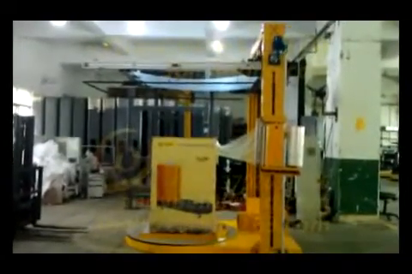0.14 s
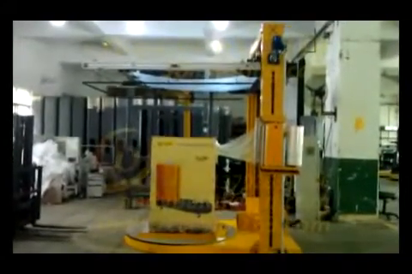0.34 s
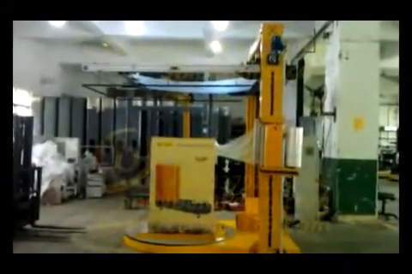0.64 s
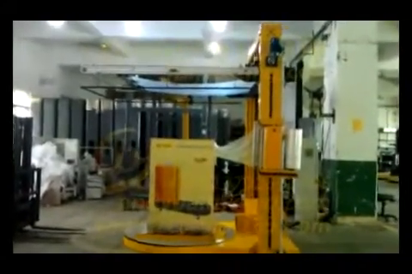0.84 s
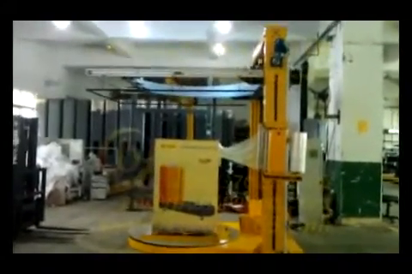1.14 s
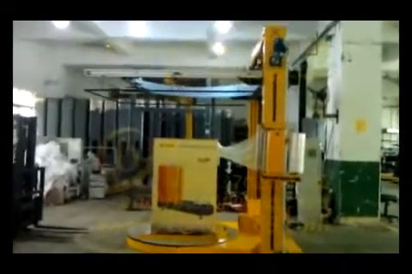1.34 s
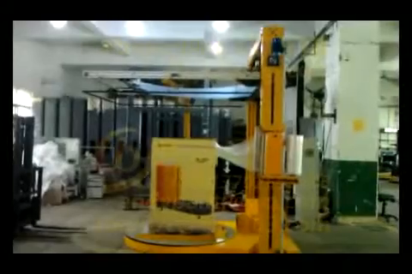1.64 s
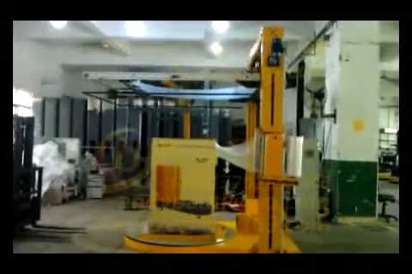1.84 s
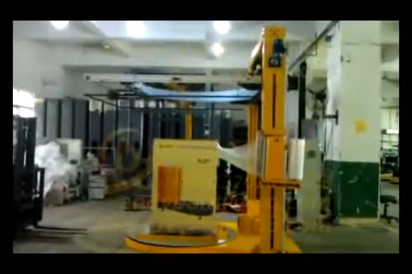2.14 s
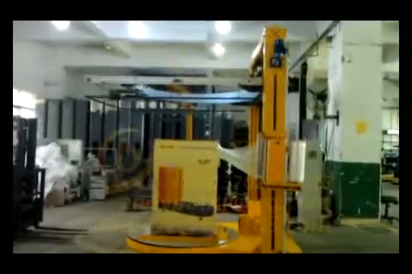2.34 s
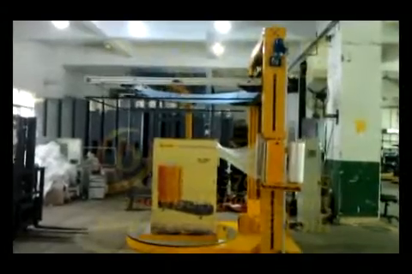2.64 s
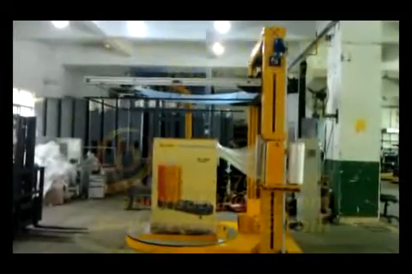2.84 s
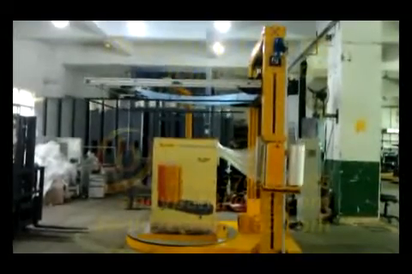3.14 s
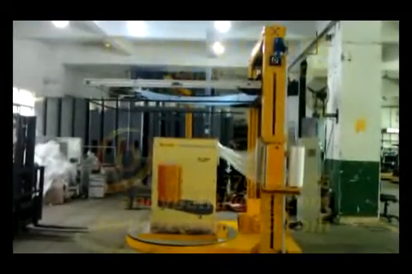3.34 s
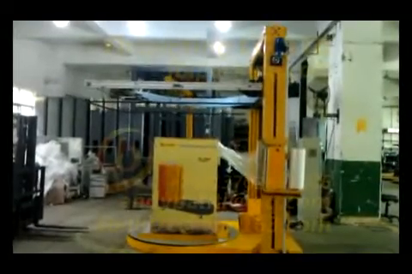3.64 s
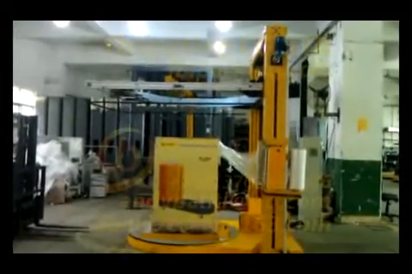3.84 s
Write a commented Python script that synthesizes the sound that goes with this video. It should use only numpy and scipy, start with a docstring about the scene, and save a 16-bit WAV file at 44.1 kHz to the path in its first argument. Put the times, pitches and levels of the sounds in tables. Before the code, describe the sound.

Stretch film is ripping from a wrapper's roll as it starts, a loud rasp until 0.25 s. At 0.7 s sharp snaps open a second crackling pull, fading by 1.15. A third judders from 1.7, ending in a big crack at 2.03 with brief metallic ringing. Small roller squeaks near 2.5 precede a long peel from 2.75, sinking in pitch until 3.7, then faintly brightening. Factory hum and hall echo persist.

```python
"""Stretch wrapping in a factory hall

A wrapper turns a pallet. Tacky film comes off the roll in juddering pulls, snaps loose with sharp cracks,
then peels in one long rasp that sinks in pitch as the roll slows and brightens again near its end.
The film sounds are random trains of stick-slip impulses, coloured by filters and answered by the hall;
the drive hums and whines underneath as noisy tones, over filtered factory noise."""
import sys
import numpy as np
from scipy import signal
from scipy.fft import rfft, irfft, next_fast_len
from scipy.io import wavfile
from scipy.ndimage import uniform_filter1d, map_coordinates

SR = 44100
rng = np.random.default_rng(int(sys.argv[2]) if len(sys.argv) > 2 else 0)


def store_pcm(level_fs):
    """Save levels as 16-bit WAV."""
    pcm = np.round(np.clip(level_fs, -1, 1) * 32767).astype(np.int16)
    wavfile.write(sys.argv[1], SR, np.atleast_2d(pcm).T)


N = 176400

# Spectra. Each row: frequency in Hz, relative level in dB.
FACTORY_SPECTRUM = [(25, -54), (55, -23.5), (90, -21), (140, -9), (240, -6.5), (400, -7.5), (700, -10),
                    (880, -9), (1400, -15), (1750, -8), (2700, -12), (4200, -8), (4800, -24.5),
                    (7000, -37.5), (10500, -36), (12500, -48), (14000, -98)]
TURNTABLE_SPECTRUM = [(25, -30), (60, -35), (140, -2.5), (320, 4.5), (450, -1), (580, 0), (700, -7.5),
                      (1300, -0.5), (3000, -55), (6000, -62)]
KNOCK_SPECTRUM = [(30, -18), (80, -2.5), (170, -0.5), (400, -1), (900, -8.5), (3000, -6), (7000, -70)]
SNAP_SPECTRUM = [(60, -20), (300, -8.5), (1200, -4.5), (2200, 10), (4200, 10), (5500, -3.5), (7800, -18),
                 (10000, -28), (15000, -38)]
CRACK_SPECTRUM = [(50, -30), (300, -7.5), (650, -9.5), (900, 0), (1250, -1.5), (1550, -5), (2300, 0),
                  (4200, 0.5), (5000, -7.5), (6500, -6.5), (7800, -11.5), (10500, -7.5), (15000, -27)]
RASP_SPECTRUM = [(60, -57), (200, -31), (600, -13.5), (1050, -8), (1400, -7), (1800, -4), (2280, 4),
                 (2600, -4), (3000, -2), (3500, -2), (4200, 1), (4900, -10.5), (5800, -45), (15000, -66)]
WEB_SPECTRUM = [(40, -20), (120, -20.5), (210, -12), (305, 2.5), (480, -3.5), (700, -6), (950, -4),
                (1500, -10.5), (3000, -37), (6000, -73)]
FIZZ_SPECTRUM = [(500, -68), (3000, -15), (4900, 8), (5600, 5.5), (6200, 5.5), (7700, -5.5), (10000, -2),
                 (12500, -8.5), (14000, -20), (15000, -40)]
PEEL_SPECTRUM = [(150, -24), (320, -6.5), (650, -7), (1200, -2), (2100, 0), (2900, -6), (3900, -0.5),
                 (4700, -9.5), (5800, -18.5), (7500, -25), (10500, -30), (12500, -41), (14000, -61)]

# Rolling noise of the turntable. Each row: time in seconds, mean level in dB.
TURNTABLE_RUN = [(0, -40), (.5, -47.5), (.7, -50), (1.25, -56.5), (1.55, -49.5), (2.1, -52.5), (2.7, -54.5),
                 (2.9, -42), (3.3, -46), (3.952, -39.5)]
# Hum and whine of the drive. Each row: frequency in Hz, level in dB, wobble rate in Hz.
DRIVE_LINES = [(229, -64, 8.9), (301, -60.5, 6.27), (897, -86, 16), (1760, -61, 22), (2240, -55, 54),
               (4140, -59, 18)]
# Brief squeaks and groans of the rollers. Each row: centre in seconds, pitch in Hz, peak level in dB,
# Gaussian spread in seconds.
SQUEAKS = [(2.506, 296, -41, 0.0059), (2.57, 4130, -41.5, 0.0068), (2.682, 4150, -44, 0.0073),
           (3.925, 582, -48, 0.2)]
# Faint rustle of slack film. Each row: time in seconds, level in dB.
RUSTLE_RUN = [(1.2, -80), (1.45, -59), (1.6, -76)]
# Knocks of the film carriage. Each row: start in seconds, level in dB, hold in seconds.
KNOCKS = [(0.71, -47, 0.012), (1.735, -42, 0.01), (1.865, -37, 0.025), (2.035, -41, 0.03),
          (3.026, -31, 0.0195)]
# Film snapping loose. Each row: start in seconds, level in dB, hold in seconds.
SNAPS = [(.069, -31, 0.0081), (.130, -38, 0.005), (.176, -31, 0.005), (.195, -39, 0.004),
         (.704, -24, 0.0049), (.710, -19.5, 0.004), (.765, -28.5, 0.014), (.826, -27, 0.03),
         (.858, -26, 0.03), (.944, -25, 0.007), (1.0, -27, 0.0044), (1.735, -20.5, 0.0069),
         (1.838, -25, 0.009), (3.585, -39, 0.0015), (3.658, -43, 0.0016)]
# The big tear-off crack. Each row: start in seconds, level in dB, hold in seconds.
CRACKS = [(2.022, -28, 0.008), (2.031, -19, 0.0078), (2.052, -23, 0.043)]
# Modes of the roll holder. Each row: frequency in Hz, starting level in dB, T60 in seconds.
HOLDER_MODES = [(1013, -32, 0.54), (1144, -29, 0.35), (1273, -26, 0.13), (2330, -31, 0.61),
                (5740, -34.5, 0.33), (6200, -36.5, 0.28), (6930, -37, 0.34)]
# Pulls of film, one list each. Each row: time in seconds, then relative levels in dB
# of the rasp, the drumming web and the treble fizz.
PULLS = [
    [(0.0, -17.5, -34.5, -35.5), (0.04, -20, -30.5, -35), (0.08, -21.5, -27.5, -31),
     (0.122, -21.5, -33, -48), (0.132, -19.5, -32.5, -24), (0.144, -26, -25.5, -55), (0.162, -27, -38, -41),
     (0.182, -23.5, -34.5, -35.5), (0.232, -34, -39, -65), (0.25, -49, -56, -64), (0.295, -39, -56, -64)],
    [(0.7, -55, -48, -31.5), (0.712, -27, -47, -25.5), (0.724, -31, -46, -38), (0.798, -27, -38, -40),
     (0.878, -28.5, -39, -33), (0.914, -31, -47, -44), (0.94, -26, -46, -42), (1.052, -28.5, -56, -54),
     (1.072, -33, -57, -65), (1.125, -40, -48, -68), (1.145, -52, -45, -71)],
    [(1.67, -47, -44.5, -52), (1.722, -31, -41, -49), (1.739, -26, -29.5, -36), (1.765, -23, -35, -41),
     (1.779, -21.5, -26, -32.5), (1.801, -23.5, -36.5, -36), (1.881, -28, -30.5, -34.5),
     (1.897, -21.5, -28, -29), (1.995, -36, -35.5, -58)],
]
# The long peel. Each row: time in seconds, relative level in dB, centre of the rasp in Hz.
PEEL_RUN = [(2.66, -53, 3570), (2.745, -37, 3450), (2.804, -29, 3100), (2.894, -22.5, 2940),
            (2.94, -22.5, 3160), (3.036, -20, 3100), (3.044, -30, 3180), (3.082, -26, 3230),
            (3.13, -23.5, 2900), (3.176, -21.5, 3040), (3.258, -26, 2740), (3.4, -25, 2430),
            (3.49, -23.5, 2440), (3.525, -27.5, 2030), (3.628, -31.5, 1800), (3.674, -29, 1900),
            (3.732, -37.5, 1930), (3.856, -35.5, 2460), (3.902, -32.5, 3000), (4.0, -34.5, 2700)]
# Decay of the hall. Each row: frequency in Hz, T60 in seconds.
HALL_T60 = [(100, 0.62), (500, 1), (2000, 1.14), (4200, 0.69), (6500, 0.61), (12000, 0.49)]

FACTORY_DB = -42.5
WHINE_HZ, WHINE_DB, WHINE_WOBBLE_HZ = 4110, -54.5, 40
SQUEAK_WOBBLE_HZ, HOLDER_WOBBLE_HZ = 35, 60
RELEASE_S = 0.0027  # time constant with which a burst lets go
SPLIT_RATE_PER_S, SPLIT_SCATTER_DB = 2500, 2.5  # slips of a snap or crack
DULLING_S, DULL_HZ = 0.062, 5130  # the treble above DULL_HZ dies away after the crack
TRAIL_DB, TRAIL_S, TRAIL_FADE_S = -22, 0.177, 0.32  # the strip keeps tearing, ever more weakly
CATCHES_PER_S, CATCH_S = 110, 0.0026  # the film catches and gives in short clumps of slips
PULL_CATCH_DB, PEEL_CATCH_DB = 7.5, 3  # height of a clump: coarse in a pull, finer in the peel
SLIPS_PER_S, SLIP_SCATTER_DB = 2600, 3
TICKS_PER_S, TICK_DB = 64, -10  # lone sharp ticks, level against the clumped slips
RASP_DB, WEB_DB, FIZZ_DB = -2.5, -0.5, -2
PEEL_DB, PEEL_PER_S, PEEL_SCATTER_DB = -1.04, 3200, 2.5
PEEL_OCTAVES, PEEL_LIFT_DB = 0.68, 11.5  # Gaussian spread and height of the sliding emphasis
BRIGHT_ABOVE_HZ, BRIGHT_DB_PER_OCTAVE = 2650, 14  # treble slope gained when the centre doubles
HALL_DB, WEB_HALL_DB = -6, -7  # diffuse tail against the early part
WALLS_DB, WALLS_S = -12, 0.028  # early bounces
FRAME_DB, FRAME_S = 0, 0.0019  # dense scatter off the machine's own frame
CEILING, KNEE, TOP_HZ = 0.36, 3, 15100


def amp(db):
    """The decibel law: level to amplitude gain."""
    return 10 ** (np.asarray(db) / 20)


def unit(x):
    """Normalization to rms 1."""
    return x / np.sqrt(np.mean(x ** 2) + 1e-20)


def along(points, hz):
    """Linear interpolation of (Hz, value) points on a logarithmic frequency axis."""
    f, v = np.transpose(points)
    return np.interp(np.log(hz + 1), np.log(f + 1), v)


def clock():
    """The time of each sample in seconds."""
    return np.arange(N) / SR


def level(s, db, fade_s=0.0068):
    """Gain along a dB curve, with exponential decay beyond its ends."""
    t = clock()
    outside = np.abs(t - np.clip(t, s[0], s[-1]))
    return amp(np.interp(t, s, db)) * np.exp(-outside / fade_s)


def wobble(rate):
    """Band-limited fluctuation: a spline through random knots, rate of them a second."""
    knots = rng.standard_normal(int(N * rate / SR) + 4)
    return map_coordinates(knots, [clock() * rate])


def narrow(hz, wobble_hz):
    """Narrow-band noise: a carrier with random complex modulation, rms 1."""
    envelope = wobble(wobble_hz) + 1j * wobble(wobble_hz)
    return unit(np.real(envelope * np.exp(2j * np.pi * hz * clock())))


def ring(x, spectrum):
    """Minimum-phase filtering: a causal body colours x, keeping the power of white input."""
    size = 4096
    cepstrum = irfft(np.log(amp(along(spectrum, np.fft.rfftfreq(size, 1 / SR)))))
    # folding the cepstrum forward makes the response causal
    cepstrum[1:size // 2] *= 2
    cepstrum[size // 2 + 1:] = 0
    body = irfft(np.exp(rfft(cepstrum)))
    return signal.fftconvolve(x, body / np.linalg.norm(body))[:N]


def slips(rate, scatter_db):
    """Stick-slip friction: tiny releases at random moments, of uneven size and either sign, rms 1."""
    size = amp(scatter_db * np.clip(rng.standard_normal(N), -2, 2)) * rng.choice([-1, 1], N)
    return unit(size * (rng.random(N) < rate / SR))


def catches(height_db):
    """Clumped friction: a gain of rms 1 that jumps at random moments and falls straight back."""
    kicks = (rng.random(N) < CATCHES_PER_S / SR) * rng.uniform(0.43, 1, N)
    decay = np.exp(-1 / (CATCH_S * SR))
    clumps = np.minimum(signal.lfilter([1], [1, -decay], kicks), 1)
    return unit(amp(height_db * clumps))


def bursts(rows):
    """Impulsive excitation: each event starts at once, holds and decays exponentially."""
    t = clock()
    return sum(amp(db) * (t >= s) * np.exp(-np.maximum(t - s - hold, 0) / RELEASE_S)
               for s, db, hold in rows)


def machinery(sway_db=-1.75, rattle_db=1.0):
    """Broadband noise with slow level modulation (factory, turntable) plus narrow-band drive lines."""
    factory = ring(rng.standard_normal(N), FACTORY_SPECTRUM)
    factory *= amp(FACTORY_DB + sway_db * wobble(9.3))
    turntable = ring(rng.standard_normal(N), TURNTABLE_SPECTRUM)
    turntable *= level(*np.transpose(TURNTABLE_RUN)) * amp(rattle_db * wobble(24.18))
    drive = sum(amp(db) * narrow(hz, wobble_hz) for hz, db, wobble_hz in DRIVE_LINES)
    return factory + turntable + drive


def squeaks():
    """Narrow-band roller tones: one faint lasting whine, and others swelling under Gaussian envelopes."""
    out = amp(WHINE_DB) * narrow(WHINE_HZ, WHINE_WOBBLE_HZ)
    for s, hz, db, spread in SQUEAKS:
        swell = np.exp(-.5 * ((clock() - s) / spread) ** 2)
        out += amp(db) * swell * narrow(hz, SQUEAK_WOBBLE_HZ)
    return out


def rustle():
    """Weak stick-slip: slack film stirs between two pulls, in the colour of the fizz."""
    return ring(level(*np.transpose(RUSTLE_RUN)) * slips(PEEL_PER_S, SPLIT_SCATTER_DB), FIZZ_SPECTRUM)


def knocks():
    """Impact: a short noise burst gives a dull bump of the film carriage."""
    return ring(bursts(KNOCKS) * rng.standard_normal(N), KNOCK_SPECTRUM)


def snaps():
    """Adhesive release: a stuck patch of film lets go in a quick volley of slips."""
    return ring(bursts(SNAPS) * slips(SPLIT_RATE_PER_S, SPLIT_SCATTER_DB), SNAP_SPECTRUM)


def crack():
    """Tearing and modal decay: the strip dulls as the tension goes, while the roll holder rings."""
    start = CRACKS[1][0]
    age = np.maximum(clock() - start, 0)
    trail = bursts([(start, TRAIL_DB, TRAIL_S)]) * np.exp(-age / TRAIL_FADE_S)
    envelope = np.hypot(bursts(CRACKS), trail)
    tear = ring(envelope * slips(SPLIT_RATE_PER_S, SPLIT_SCATTER_DB), CRACK_SPECTRUM)
    dull = signal.sosfiltfilt(signal.butter(3, DULL_HZ, fs=SR, output="sos"), tear)
    treble = (tear - dull) * np.exp(-age / DULLING_S)
    holder = sum(amp(db - 60 * age / t60) * narrow(hz, HOLDER_WOBBLE_HZ) for hz, db, t60 in HOLDER_MODES)
    return dull + treble + holder * (age > 0)


def pulls():
    """Shared excitation: the same slips rasp and fizz on the roll and drum on the taut web."""
    rasp_level, web_level, fizz_level = (
        sum(level(np.array(p)[:, 0], np.array(p)[:, column]) for p in PULLS) for column in (1, 2, 3))
    judder = unit(slips(SLIPS_PER_S, SLIP_SCATTER_DB) * catches(PULL_CATCH_DB))
    sharp = unit(judder + amp(TICK_DB) * slips(TICKS_PER_S, SPLIT_SCATTER_DB))
    rasp = amp(RASP_DB) * ring(judder * rasp_level, RASP_SPECTRUM)
    fizz = amp(FIZZ_DB) * ring(sharp * fizz_level, FIZZ_SPECTRUM)
    web = amp(WEB_DB) * ring(judder * web_level, WEB_SPECTRUM)
    return rasp + fizz, web


def peel():
    """Time-varying filtering: dense fine slips whose spectral emphasis follows the film's speed."""
    s, db, centre = np.transpose(PEEL_RUN)
    grain = slips(PEEL_PER_S, PEEL_SCATTER_DB) * catches(PEEL_CATCH_DB)
    hz, t, z = signal.stft(ring(grain, PEEL_SPECTRUM), SR, nperseg=256)
    hz_column = hz[:, None]
    centre = np.interp(t, s, centre)
    octaves = np.log2((hz_column + 1) / centre)
    lift = PEEL_LIFT_DB * np.exp(-.5 * (octaves / PEEL_OCTAVES) ** 2)
    slope = BRIGHT_DB_PER_OCTAVE * np.log2(centre / BRIGHT_ABOVE_HZ)
    tilt = slope * np.log2(np.maximum(hz_column / BRIGHT_ABOVE_HZ, 1))
    gain = amp(lift + tilt)
    # equal expected power in each frame, so that only the colour slides
    gain /= np.linalg.norm(gain * amp(along(PEEL_SPECTRUM, hz))[:, None], axis=0)
    rasp = unit(signal.istft(z * gain, SR, nperseg=256)[1][:N])
    return rasp * level(s, db) * amp(PEEL_DB)


def hall(x, tail_db, count=24):
    """Room response: direct sound, frame scatter, early bounces and a frequency-dependent diffuse tail."""
    hz, t, z = signal.stft(rng.standard_normal(SR), SR, nperseg=256)
    decay = amp(-60 * t / along(HALL_T60, hz)[:, None])
    tail = signal.istft(z * decay, SR, nperseg=256)[1]
    frame = rng.standard_normal(len(tail)) * np.exp(-np.arange(len(tail)) / SR / FRAME_S)
    near = amp(FRAME_DB) * frame / np.linalg.norm(frame)
    near[0] += 1  # direct sound
    bounces = (rng.uniform(.1, 1, count) * WALLS_S * SR).astype(int)
    near[bounces] += amp(WALLS_DB) * rng.choice([-1, 1], count) / np.sqrt(count)
    lead = 256  # samples of room for what the flattening spreads ahead of the direct sound
    early = rfft(np.pad(near, (lead, 0)))
    # a flattened spectrum smears each slip without colouring it
    near = irfft(early / np.sqrt(uniform_filter1d(np.abs(early) ** 2, size=120)))
    near[SR // 2:] = 0
    answer = near + amp(tail_db) * np.pad(tail, (lead, 0)) / np.linalg.norm(tail)
    return signal.fftconvolve(x, answer / np.linalg.norm(answer))[lead:lead + N]


def scene():
    """Superposition: the film and knocks in the hall, over the squeaks and machinery."""
    roll, web = pulls()
    film = hall(roll + snaps() + rustle(), HALL_DB) + hall(crack(), HALL_DB) + hall(peel(), HALL_DB)
    low = hall(web + knocks(), WEB_HALL_DB)
    return (film + low + squeaks() + machinery())[None]


def record(dry):
    """Saturation and band limiting: the highest peaks are rounded, and all from TOP_HZ up is removed."""
    soft = dry / (1 + np.abs(dry / CEILING) ** (2 * KNEE)) ** (.5 / KNEE)
    size = next_fast_len(N + SR // 2)
    passband = np.fft.rfftfreq(size, 1 / SR) < TOP_HZ
    return irfft(rfft(soft, size) * passband, size)[:, :N]


dry = scene()
out = record(dry)
store_pcm(out)
```